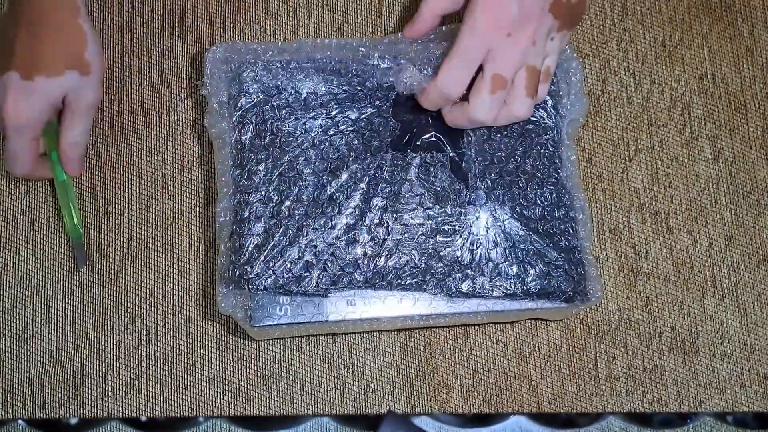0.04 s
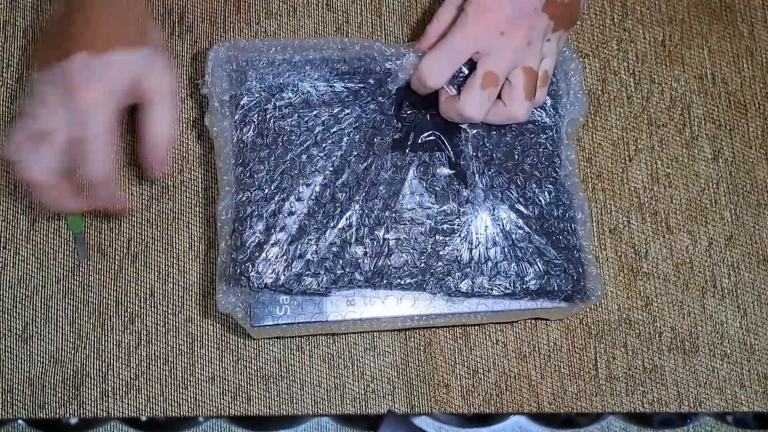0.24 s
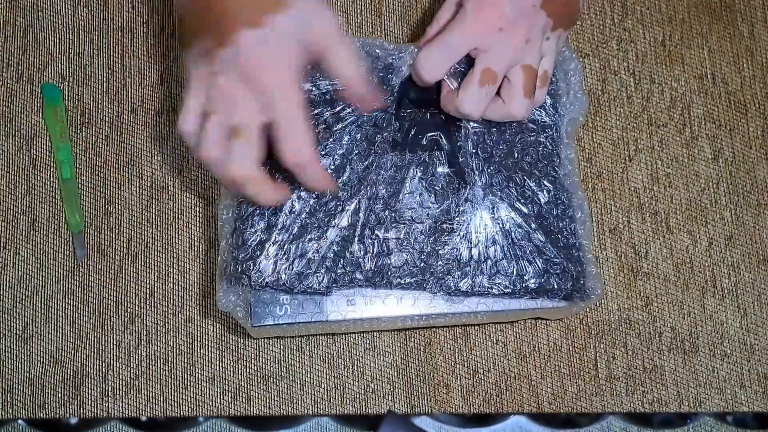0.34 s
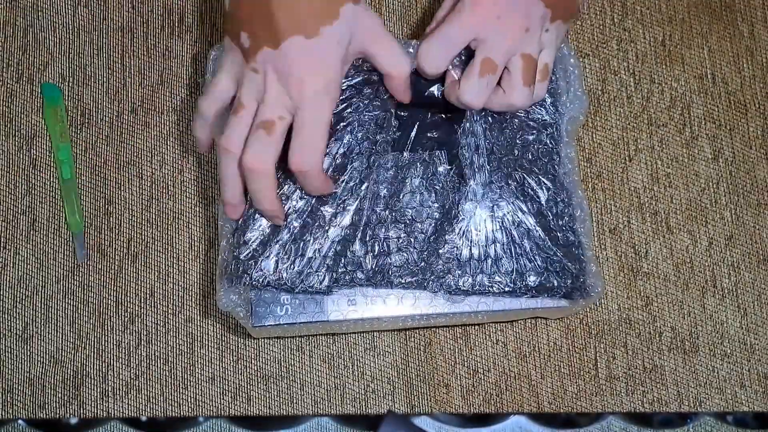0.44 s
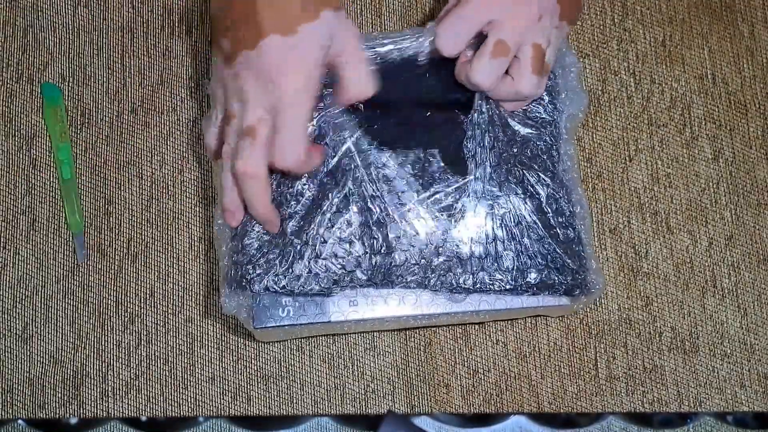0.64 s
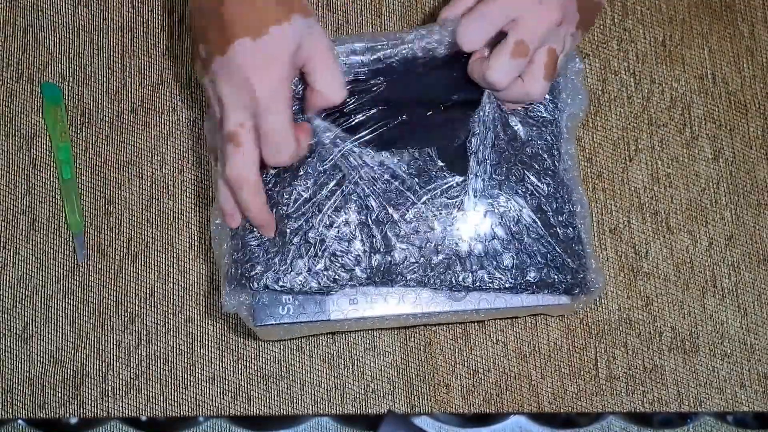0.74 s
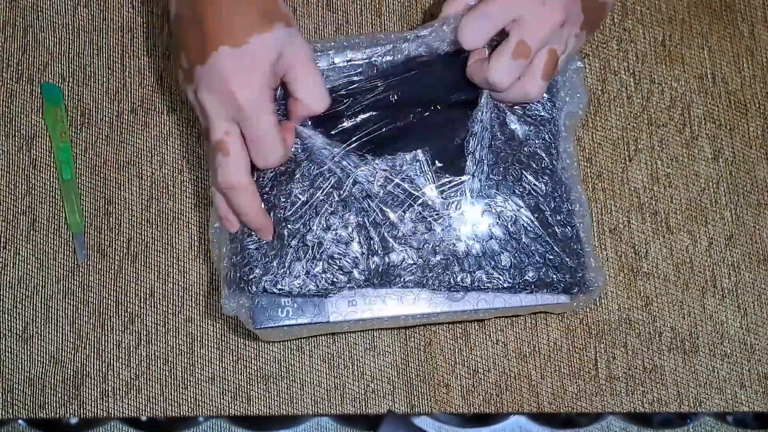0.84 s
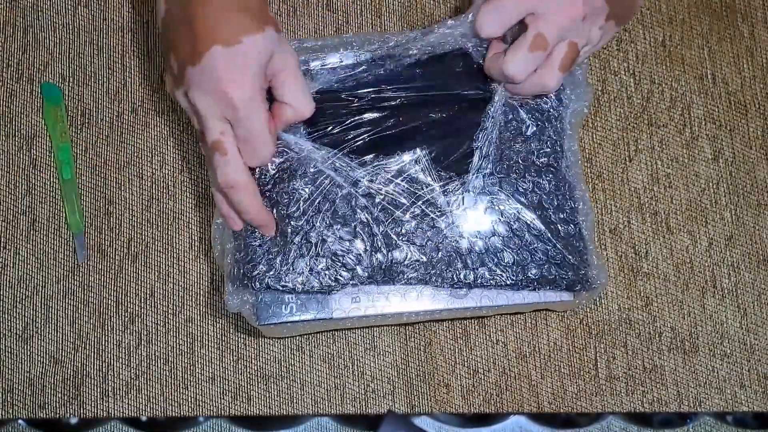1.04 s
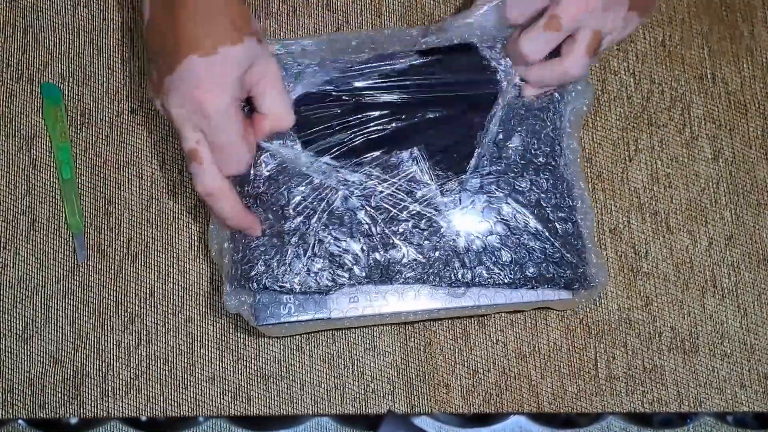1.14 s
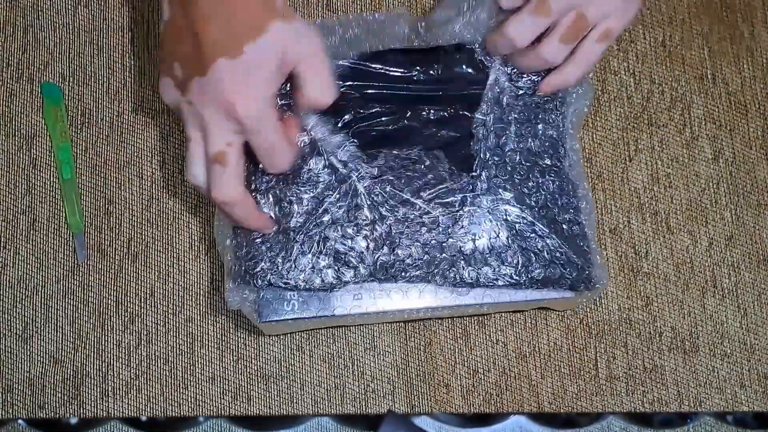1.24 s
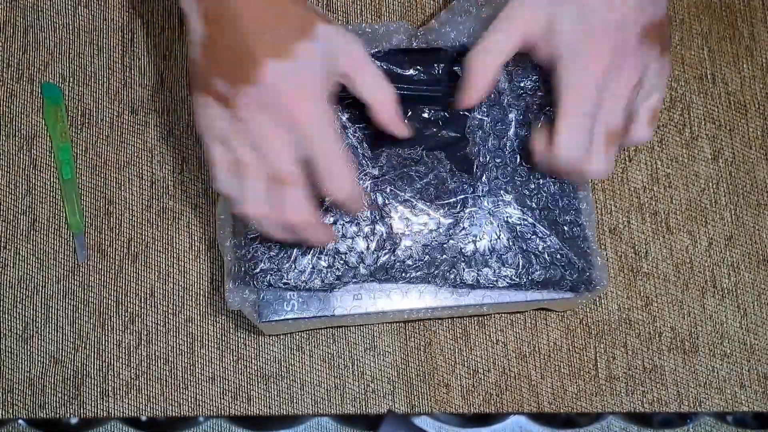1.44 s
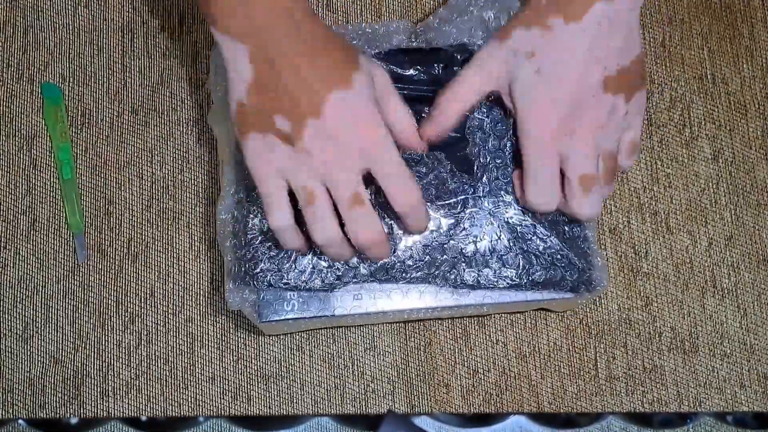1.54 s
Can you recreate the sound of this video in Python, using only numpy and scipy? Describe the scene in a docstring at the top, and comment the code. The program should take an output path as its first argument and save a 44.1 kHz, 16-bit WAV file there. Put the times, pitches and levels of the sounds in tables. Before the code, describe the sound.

Hands tear open plastic bubble wrap around a box, crackle swelling sharply, then stopping, indoors

```python
"""Tearing bubble wrap

Indoors, hands pull open a slit in the bubble wrap around a box. The film gives short bright snaps,
made of filtered noise bursts, and creases in the taut film give duller pops that ring in the box.
Thousands of tiny clicks make the crackle and its dull rustle. Filtered noise makes a faint low rumble
through the table and quiet room air. Two microphone ports colour left and right differently."""
import sys
import numpy as np
from scipy import signal
from scipy.fft import rfft, irfft
from scipy.io import wavfile

SR = 44100
rng = np.random.default_rng(int(sys.argv[2]) if len(sys.argv) > 2 else 0)


def generate_wav(signal):
    """Clip the signal to [-1, 1] and save it as 16-bit WAV at the path in sys.argv[1]."""
    frames = np.transpose(np.atleast_2d(signal))
    scaled = np.clip(frames, -1, 1) * 32767
    pcm = np.round(scaled).astype(np.int16)
    wavfile.write(sys.argv[1], SR, pcm)


N = 70560  # length in samples, 1.6 s

# All levels of sources below are before the room and the ports.
# How the crackle and rustle swell while the film is pulled. Each row: time in seconds, average (rms)
# level of the bright crackle in dB, of its middle in dB, of the dull rustle in dB.
PULL = [(0.0, -41, -62, -52.5), (0.11, -40.5, -49, -48), (0.164, -41, -56, -50.5),
        (0.208, -32.5, -50.5, -46.5), (0.234, -36.5, -49, -50), (0.239, -27, -65, -49.5),
        (0.276, -34, -57, -49.5), (0.31, -30, -56, -49.5), (0.338, -35.5, -51, -50.5),
        (0.388, -30, -54, -52), (0.394, -30.5, -41.5, -49.5), (0.436, -37.5, -55.5, -49.5),
        (0.498, -27.5, -41, -45), (0.52, -32.5, -47, -52), (0.542, -35, -50, -46),
        (0.646, -24.5, -39, -48.5), (0.658, -25.5, -30, -44), (0.68, -26.5, -45.5, -55),
        (0.722, -24, -40, -43.5), (0.744, -26.5, -41, -48), (0.756, -19.5, -33, -34),
        (0.774, -23, -30, -41), (0.788, -20, -29.5, -44), (0.814, -29, -41, -36),
        (0.842, -28.5, -48, -43.5), (0.876, -18.5, -33.5, -43), (0.918, -29, -41, -45),
        (0.984, -25.5, -42.5, -47), (1.082, -24, -45.5, -46.5), (1.09, -31.5, -50, -54.5),
        (1.202, -20.5, -35, -45), (1.212, -24, -23.5, -32.5), (1.255, -24.5, -34.5, -37.5),
        (1.29, -30, -38.5, -39.5), (1.39, -38.5, -48.5, -50.5), (1.416, -34.5, -53, -41),
        (1.466, -50.5, -63, -55.5), (1.6, -57, -63, -83)]
# The low rumble through the table. Each row: time in seconds, average (rms) level in dB.
RUMBLE = [(0.0, -56.5), (0.146, -44.5), (0.306, -59), (0.472, -53), (0.498, -46), (0.53, -57), (0.596, -40),
          (0.672, -49.5), (0.694, -56), (0.836, -45.5), (0.854, -57), (0.89, -43), (0.958, -60),
          (1.148, -52.5), (1.18, -80), (1.23, -61), (1.274, -61), (1.318, -51), (1.38, -44), (1.546, -61),
          (1.6, -54)]
# Tone of the room air; only its shape matters. Each row: frequency in Hz, strength in dB per Hz.
AIR = [(20, -34), (45, -8), (120, -5), (250, -3.5), (500, -11), (1500, -18), (5000, -35), (16000, -74)]
# The loudest snaps of the film. Each row: start in seconds, peak of the low part in dB,
# of the middle part in dB, of the treble part in dB.
SNAPS = [(0.1113, -30, -27, -33), (0.2356, -28, -22, -22), (0.237, -25, -25, -13), (0.2384, -28, -11, -11),
         (0.2393, -29, -12, -11), (0.2406, -31, -14, -14), (0.2422, -28, -25, -13), (0.2449, -28, -13, -13),
         (0.2478, -30, -27, -14), (0.2563, -37, -22, -20), (0.2931, -31, -19, -19), (0.3069, -29, -19, -22),
         (0.3092, -31, -22, -17), (0.3219, -30, -18, -15), (0.3243, -33, -24, -12), (0.3911, -21, -20, -15),
         (0.3936, -27, -26, -16), (0.4126, -29, -24, -23), (0.4575, -28, -22, -24), (0.4923, -28, -23, -20),
         (0.5057, -27, -21, -20), (0.5829, -27, -20, -17), (0.6244, -21, -15, -20), (0.6343, -26, -18, -21),
         (0.6456, -25, -15, -16), (0.6593, -22, -23, -11), (0.6658, -16, -13, -15), (0.6741, -22, -16, -14),
         (0.7436, -24, -11, -12), (0.751, -22, -15, -17), (0.7535, -20, -14, -12), (0.7678, -20, -15, -12),
         (0.779, -15, -10, -13), (0.7867, -17, -12, -17), (0.7898, -20, -15, -13), (0.797, -24, -13, -15),
         (0.8003, -22, -18, -20), (0.8571, -27, -18, -16), (0.8885, -24, -14, -18), (0.8984, -25, -15, -21),
         (0.9166, -26, -20, -19), (0.9476, -25, -11, -9), (0.9578, -21, -22, -21), (1.0307, -36, -20, -14),
         (1.0444, -25, -13, -8), (1.0524, -31, -15, -18), (1.0619, -18, -12, -10), (1.0664, -21, -17, -8),
         (1.0785, -22, -9, -9), (1.0835, -27, -15, -12), (1.0959, -22, -13, -14), (1.1023, -23, -13, -16),
         (1.1197, -23, -14, -10), (1.1342, -30, -18, -8), (1.1457, -22, -13, -10), (1.1531, -21, -13, -13),
         (1.1595, -28, -19, -11), (1.1768, -18, -22, -15), (1.1878, -18, -16, -10), (1.2003, -19, -12, -9),
         (1.2063, -20, -14, -17), (1.2105, -18, -14, -16), (1.2208, -14, -19, -11), (1.2448, -23, -16, -12),
         (1.2503, -24, -18, -16), (1.2595, -13, -9, -13)]
# Where a snap is split: low to middle to treble, and where the treble starts to fall, in Hz.
SNAP_EDGES_HZ = [2500, 4200, 6600, 10000]
# Dull pops of the taut film. Each row: start in seconds, peak in dB, bottom in Hz, top in Hz.
POPS = [(.1113, -26, 600, 4000), (.3911, -20, 1200, 5000), (.4575, -28, 900, 4000), (.5055, -17, 800, 3500),
        (.6243, -26, 1100, 2500), (.657, -21, 500, 2500), (.666, -20, 800, 2500), (.755, -23, 300, 2500),
        (.787, -17, 280, 800), (.792, -21, 280, 800), (1.2065, -20, 500, 2500), (1.2105, -12, 900, 2500),
        (1.221, -19, 450, 2500), (1.225, -15, 550, 1500), (1.245, -21, 800, 2500), (1.2597, -18, 900, 2500),
        (1.273, -26, 1200, 2800), (1.417, -31, 300, 550)]
# Colour of the microphone ports. Each row: frequency in Hz, left gain in dB, right gain in dB.
PORTS = [(103, -1, 1), (620, -5, -2), (1490, -8, -4), (2450, -4.5, -1), (3300, -3.5, 2), (4370, -8, 5.5),
         (5760, -8.5, 2.5), (6920, -16, 0), (7630, -6, 4), (7540, -6.5, 6.5), (9620, -10, 3),
         (9950, -5.5, -4.5), (12200, -6.5, -28), (12200, -8, -6.5), (14900, -6, -4.5), (16300, 3, -3)]

# Tiny clicks: how many on average, how uneven in size, how strongly and how fast they clump
GRAINS_PER_S, GRAIN_SPREAD_DB, CLUMP_DB, CLUMP_DRIFT_HZ = 5000, 1.8, .5, 40
CRACKLE_LOW_HZ, RUSTLE_LOW_HZ, RUSTLE_HIGH_HZ = 3300, 213, 1320
RUMBLE_HZ, RUMBLE_WIDTH_HZ = 68.2, 32.7
AIR_DB = -54
# The crack is the first sample of a burst, in dB over its noise
SNAP_MS, SNAP_TAIL_MS, SNAP_TAIL_DB, SNAP_CRACK_DB = .25, 2.5, -12, 22
POP_MS, POP_CRACK_DB = .45, 26
BOX_HZ, BOX_WIDTH_HZ, BOX_DB = [357, 750, 1207], 220, 4.5  # resonances of the wrapped box
ROOM_T60_S, ROOM_DB = .12, -8  # time for reflections to die by 60 dB, and their level
# Sounds come from all over the film, so each reaches the left port a little earlier or later
PLACE_SPREAD_S = .00008
RIGHT_LAG_S = .00008
TOP_STOP_HZ = 16198.7  # from here up, sound is at least 90 dB down


def from_db(db):
    """Turn decibels into gain."""
    return 10 ** (np.asarray(db) / 20)


def rms_one(x):
    """Scale a sound to an average (rms) strength of 1."""
    return x / np.sqrt(np.mean(x ** 2) + 1e-20)


def in_time(rows):
    """Join the columns of a table by straight lines in time."""
    s, *columns = np.transpose(rows)
    t = np.arange(N) / SR
    return [np.interp(t, s, column) for column in columns]


def cut(x, hz, kind, order=2):
    """Keep only some frequencies, with a Butterworth filter."""
    sos = signal.butter(order, hz, kind, fs=SR, output="sos")
    return signal.sosfilt(sos, x)


def colour(x, hz, db, lag_s=0., size=4096):
    """Follow a dB curve over log frequency with a filter that responds as early as it can."""
    f = np.maximum(np.arange(size // 2 + 1) * SR / size, 1)
    curve_db = np.interp(np.log(f), np.log(hz), db)
    # Fold the cepstrum (the spectrum of the log gain) forward: this gives minimum phase
    cepstrum = irfft(np.log(from_db(curve_db)))
    cepstrum[1:size // 2] *= 2
    cepstrum[size // 2 + 1:] = 0
    response = np.exp(rfft(cepstrum) - 2j * np.pi * f * lag_s)
    return signal.fftconvolve(x, irfft(response))[:N]


def drift(rate_hz):
    """Wander slowly at random with spread 1: noise smoothed twice."""
    r = np.exp(-2 * np.pi * rate_hz / SR)
    noise = rng.standard_normal(N + SR)
    return rms_one(signal.lfilter([1], [1, -2 * r, r * r], noise)[SR:])  # skip the settling second


def crackle():
    """Tiny clicks of uneven size in clumps: their treble is the crackle, their low part the rustle."""
    bright_db, middle_db, dull_db = in_time(PULL)
    unevenness = np.minimum(rng.exponential(1, N), 4)
    sizes = from_db(GRAIN_SPREAD_DB * unevenness) * rng.choice([-1, 1], N)
    happens = rng.random(N) < GRAINS_PER_S / SR
    right = sizes * happens * from_db(CLUMP_DB * drift(CLUMP_DRIFT_HZ))

    # The same clicks on the left, each moved slightly in time
    moved = np.arange(N) + rng.normal(0, PLACE_SPREAD_S * SR, N)
    moved = np.clip(moved, 0, N - 1).astype(int)
    left = np.bincount(moved, right, N)
    grains = np.array([left, right])

    bright = rms_one(cut(grains, CRACKLE_LOW_HZ, "high", order=3))
    middle = rms_one(cut(grains, [RUSTLE_HIGH_HZ, CRACKLE_LOW_HZ], "band"))
    dull = rms_one(cut(grains, [RUSTLE_LOW_HZ, RUSTLE_HIGH_HZ], "band"))
    # The middle is added upside down
    return from_db(bright_db) * bright - from_db(middle_db) * middle + from_db(dull_db) * dull


def room(x):
    """Add reflections as short dying noise, different on each side."""
    t = np.arange(SR // 4) / SR
    fade = from_db(-60 * t / ROOM_T60_S) * (t > .0005)  # reflections come after the direct sound
    tails = rng.standard_normal((2, len(t))) * fade
    tails = tails / np.sqrt(np.sum(tails ** 2, axis=1, keepdims=True))  # energy 1 on each side
    tails = cut(tails, 260, "high")
    return from_db(ROOM_DB) * signal.fftconvolve(x, tails, axes=1)[:, :N]


def rumble():
    """Let noise through one narrow low band, as a table resonance would."""
    edges = [RUMBLE_HZ - RUMBLE_WIDTH_HZ / 2, RUMBLE_HZ + RUMBLE_WIDTH_HZ / 2]
    noise = rng.standard_normal(N + SR)
    low = rms_one(cut(noise, edges, "band", order=3)[SR:])  # skip the settling second
    level_db, = in_time(RUMBLE)
    return from_db(level_db) * low


def air():
    """Steady room noise: both ports share one part, and above the bass each adds its own."""
    hz, db = np.transpose(AIR)
    shared, left, right = (colour(noise, hz, db) for noise in rng.standard_normal((3, N)))
    own = cut(np.array([left, right]), 440, "high")
    return from_db(AIR_DB) * rms_one(shared + own)


def bursts(s, decay_ms, tail_ms=1., tail_db=-99., crack_db=-99.):
    """Make each event a crack, then noise with a quick rise, a fast decay and a slower tail."""
    t = np.arange(SR // 25) / SR * 1000  # milliseconds
    body = t / decay_ms * np.exp(1 - t / decay_ms)  # highest at decay_ms
    tail = from_db(tail_db) * np.exp(-t / tail_ms)
    crack = from_db(crack_db) * (t == 0)
    return rng.standard_normal((len(s), len(t))) * (body + tail) + crack


def at_peak(rows, db, body):
    """Scale each row by the gain that brings the envelope of its body to the given peak."""
    peaks = np.max(np.abs(signal.hilbert(body)), axis=1)
    return rows * (from_db(db) / peaks)[:, None]


def place(s, rows):
    """Lay the rows out at their times, each a little early or late at the left port."""
    out = np.zeros((2, N + SR))
    lags = rng.normal(0, PLACE_SPREAD_S, len(s))
    for start, lag, row in zip(s, lags, rows):
        for side, i in enumerate([int((start + lag) * SR), int(start * SR)]):
            out[side, i:i + len(row)] += row
    return out[:, :N]


def snaps():
    """Bright snaps of the film: noise bursts with their own low, middle and treble strength."""
    s, low_db, middle_db, treble_db = np.transpose(SNAPS)
    rows = bursts(s, SNAP_MS, SNAP_TAIL_MS, SNAP_TAIL_DB, SNAP_CRACK_DB)
    low = cut(rows, SNAP_EDGES_HZ[0:2], "band", order=3)
    middle = cut(rows, SNAP_EDGES_HZ[1:3], "band", order=3)
    treble = cut(rows, SNAP_EDGES_HZ[2], "high", order=4)
    treble = cut(treble, SNAP_EDGES_HZ[3], "low", order=1)

    low = at_peak(low, low_db, low)
    middle = at_peak(middle, middle_db, middle)
    # The treble level counts only what lies below the last edge
    treble_body = cut(treble, SNAP_EDGES_HZ[3], "low", order=4)
    treble = at_peak(treble, treble_db, treble_body)
    return place(s, low - middle + treble)  # the middle is added upside down


def pops():
    """Dull pops of the taut film: noise bursts in a band, ringing briefly in the box."""
    s, db, low_hz, top_hz = np.transpose(POPS)
    rows = bursts(s, POP_MS, crack_db=POP_CRACK_DB)
    rows = np.array([cut(row, edges, "band") for row, *edges in zip(rows, low_hz, top_hz)])
    for hz in BOX_HZ:
        b, a = signal.iirpeak(hz, hz / BOX_WIDTH_HZ, SR)
        rows = rows + from_db(BOX_DB) * signal.lfilter(b, a, rows)
    return place(s, at_peak(rows, db, rows))


def scene():
    """Add up the film, its reflections in the room, the rumble and the air."""
    film = snaps() + pops() + crackle()
    return film + room(film) + rumble() + air()


def record(dry):
    """Give each port its own colour, let the right hear a little later, and cut the top."""
    hz, left_db, right_db = np.transpose(PORTS)
    left = colour(dry[0], hz, left_db)
    right = colour(dry[1], hz, right_db, RIGHT_LAG_S)
    top_cut = signal.cheby2(24, 90, TOP_STOP_HZ, fs=SR, output="sos")
    return signal.sosfilt(top_cut, np.array([left, right]))


dry = scene()
out = record(dry)
generate_wav(out)
```